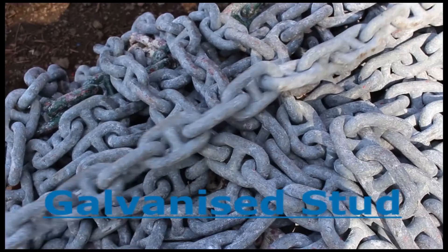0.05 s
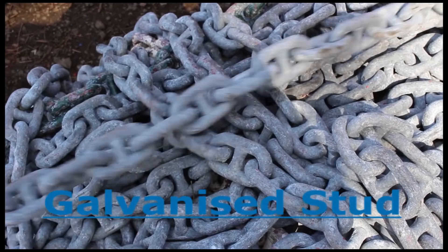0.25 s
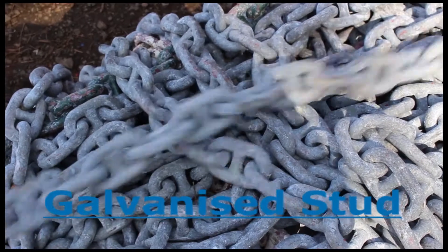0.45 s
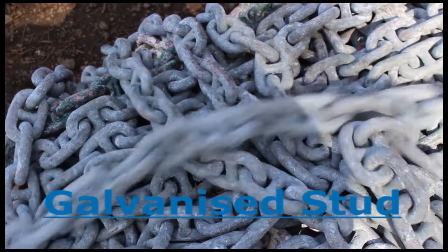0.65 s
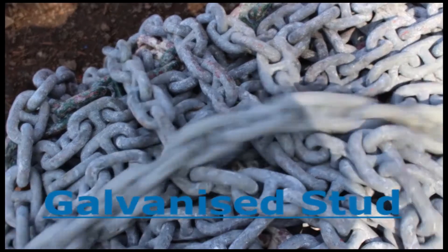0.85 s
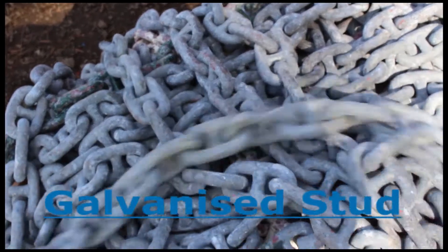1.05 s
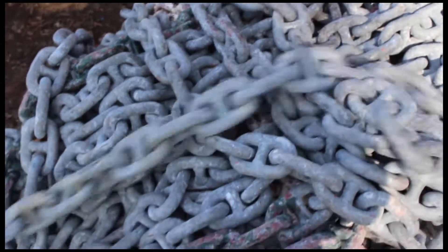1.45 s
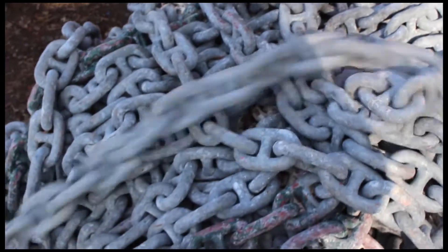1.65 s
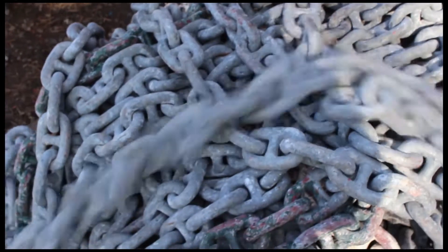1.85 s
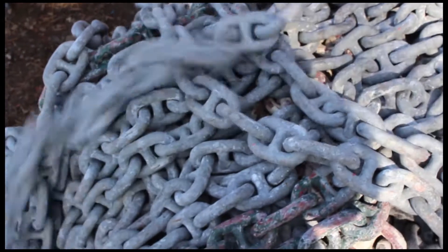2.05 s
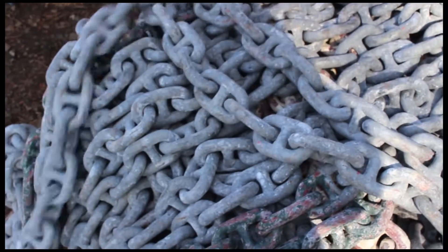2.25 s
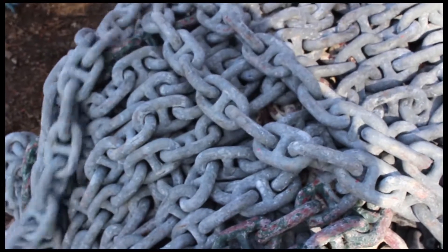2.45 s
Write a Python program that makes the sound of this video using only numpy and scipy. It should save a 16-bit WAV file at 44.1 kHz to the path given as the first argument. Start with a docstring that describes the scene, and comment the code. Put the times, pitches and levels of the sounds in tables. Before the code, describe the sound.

A heavy metal chain is hauled over a chain pile, close by outdoors. Dull knocks start at 0.2 seconds, building from 0.4 into dense rattling with short, bright clinks. It eases around 1.3 seconds, then surges at 1.4 with soft thumps of falling loops. The clinking continues until about 2.3 seconds and thins to light taps by 2.6. Faint wind rumble and a dull wash lie underneath.

```python
"""Hauling a heavy chain

A galvanised stud-link chain is hauled over a pile of chain, outdoors and close by. Each collision is a dull
knock and a short bright ring from two bending modes of a link, dying away quickly. Small contacts chatter in
between, slack loops thump onto the pile, and underneath are a dull background wash of noise and a light rumble
of wind."""
import sys
import numpy as np
from scipy import signal
from scipy.io import wavfile

SR = 44100
rng = np.random.default_rng(int(sys.argv[2]) if len(sys.argv) > 2 else 0)


def to_wav(sig):
    """Store sig (one row per channel, or 1-D mono) as 16-bit WAV at the path in sys.argv[1].

    Samples outside -1..1 are clipped; the rate is SR.
    """
    pcm = np.clip(np.atleast_2d(sig), -1, 1) * 32767
    pcm = np.round(pcm).astype(np.int16)
    wavfile.write(sys.argv[1], SR, pcm.T)  # frames by channels


N = 114660
HIT_T = np.arange(8192) / SR  # seconds since a hit


def amp(db):
    """Decibels to gain."""
    return 10 ** (np.asarray(db) / 20)


def unit(x):
    """Scales to rms 1."""
    return x / np.sqrt(np.mean(x ** 2) + 1e-20)


def fader(points):
    """Gain over the whole scene, gliding between points of time and dB."""
    return amp(np.interp(np.arange(N) / SR, *np.transpose(points)))


def add(mix, start_s, sound):
    """Mixes a sound in at its start time."""
    part = mix[max(round(start_s * SR), 0):][:len(sound)]
    part += sound[:len(part)]


def wander(rate_hz, shape):
    """Smooth random motion of rms 1."""
    return unit(signal.lfilter(*signal.butter(2, rate_hz, fs=SR), rng.standard_normal(shape)))


def colour(x, eq, tilt_db=0, corner_hz=np.inf):
    """Causal filter of unit power gain: an EQ curve, a mid-range tilt per octave, a treble roll-off."""
    hz = abs(np.fft.fftfreq(len(x), 1 / SR))
    eq_hz, eq_db = np.transpose(eq)
    db = np.interp(np.log(hz + 1), np.log(eq_hz), eq_db) + tilt_db * np.log2(np.clip(hz, 1500, 5500))
    gain = unit(amp(db) / (1 + (hz / corner_hz) ** 4))
    minimum_phase = np.exp(signal.hilbert(np.log(gain + 1e-6)).conj())
    return np.fft.ifft(np.fft.fft(x) * minimum_phase).real


# The wind's tone. Each row: frequency in Hz, relative level in dB.
WIND_EQ = [(20, -12.5), (55, -12.5), (88, 1.5), (135, -7.5), (250, -10.5), (3000, -83)]
# The wind's swells. Each row: time in seconds, level in dB.
WIND_FADER = [(0, -67), (.13, -60), (.38, -64), (.5, -68.5), (.8, -77.5), (1.15, -79), (1.42, -69),
              (1.65, -74.5), (1.9, -88), (2.6, -72)]
def wind(gust_db=2, gust_hz=15):
    """Light wind: a low rumble that wavers in quick gusts."""
    rumble = unit(colour(rng.standard_normal(N), WIND_EQ))
    gusts = unit(amp(gust_db * wander(gust_hz, N)))
    return rumble * gusts * fader(WIND_FADER)


# The wash's tone. Each row: frequency in Hz, relative level in dB.
WASH_EQ = [(40, -34), (130, -5.5), (330, 4.5), (1100, 3), (1900, -5), (7000, -30), (8600, -16),
           (13000, -51)]
# The wash's swells. Each row: time in seconds, level in dB.
WASH_FADER = [(0, -63.5), (.2, -55.5), (.39, -55), (.45, -61.5), (.55, -54), (.7, -68.5), (1.15, -62),
              (1.45, -56), (1.85, -68), (2.6, -66.5)]
def wash():
    """A dull background wash of noise that swells and fades."""
    return unit(colour(rng.standard_normal(N), WASH_EQ)) * fader(WASH_FADER)


def echo(x, level_db=-11, t60_s=0.12):
    """Brief scatter from the pile and the yard."""
    tail = rng.standard_normal(len(HIT_T)) * np.exp(-np.log(1000) * HIT_T / t60_s) * (HIT_T > .002)
    return amp(level_db) * signal.oaconvolve(x, tail / np.linalg.norm(tail))[:N]


# Loops landing and the pile shifting. Each row: start in seconds, relative level in dB,
# decay time constant in seconds, centre in Hz, width in octaves.
LOOP_FALLS = [(0.564, -38, 0.0037, 620, 1.43), (1.227, -59, 0.025, 89, .8),
              (1.421, -39.5, 0.0086, 473, 0.99), (1.45, -49, 0.012, 275, 0.68),
              (1.524, -64, 0.02, 116, 0.66), (1.594, -55, 0.015, 300, 0.42),
              (1.672, -44, 0.0025, 590, 0.86)]
def thumps(rise_s=0.0021):
    """The pile takes the weight of a falling loop: a dull resonance."""
    out = np.zeros(N)
    octaves = np.linspace(-6, 6, 25)
    for start_s, db, decay_s, hz, width in LOOP_FALLS:
        envelope = (1 - np.exp(-HIT_T / rise_s)) * np.exp(-HIT_T / decay_s)
        eq = np.column_stack([hz * 2 ** octaves, -4 * (octaves / width) ** 2])
        add(out, start_s, 2 * amp(db) * colour(rng.standard_normal(len(HIT_T)) * envelope, eq))
    return out


# The tone all knocks share. Each row: frequency in Hz, relative level in dB.
KNOCK_EQ = [(60, -31), (300, -11.5), (1100, -6), (2500, 3.5), (4800, 0.5), (6800, -5.5), (9300, 2),
            (11000, -18.5), (12800, -31), (14700, -19), (16000, -34)]
def clack_eq(centre_hz=3330, boost_db=4, width_octaves=.25):
    """The knock's tone plus a resonance that depends on how the links lie, drawn at random."""
    eq_hz, eq_db = np.transpose(KNOCK_EQ)
    hz = np.geomspace(eq_hz[0], eq_hz[-1], 200)
    octaves = np.log2(hz / centre_hz) + rng.random() - .5
    peak_db = boost_db * np.exp(-(octaves / width_octaves) ** 2)
    return np.column_stack([hz, np.interp(np.log(hz), np.log(eq_hz), eq_db) + peak_db])


def knock(hardness_db, force_db, rise_s=0.00034, crack_s=0.00058, shudder_s=0.0029):
    """A gritty crack, a quick rebound and the damped shudder of the links beneath."""
    t = HIT_T[:2048]
    since_rebound = t - .003 * rng.random()
    crack = np.exp(-t / crack_s)
    rebound = amp(-10.5) * np.exp(-abs(since_rebound) / crack_s) * (since_rebound > 0)
    shudder = amp(-7) * np.exp(-t / shudder_s)
    burst = rng.standard_normal(len(t)) * (crack + rebound + shudder) * (1 - np.exp(-t / rise_s))
    corner_hz = 9160 * amp(hardness_db + 0.099 * force_db)  # hard, strong contacts reach higher
    sound = colour(burst, clack_eq(), hardness_db, corner_hz)
    attack = sound[:round(.003 * SR)]
    return sound / np.sqrt(np.mean(attack ** 2))


MODES_HZ = np.array([[8289], [8985], [14600]])  # lower mode, upper mode, overtone
SHAPE_SPREAD, SIZE_SPREAD = np.array([[.005], [.005], [.016]]), .008  # as shares of pitch
def ring(lower_db, upper_db, t60_s, overtone_db=-31, rise_s=0.00057, flutter_hz=203):
    """One link's two beating modes and a faint overtone; size, shape and damping vary by link."""
    detune, damping = np.clip(rng.standard_normal((2, 3, 1)), -2, 2)
    size = 1 + SIZE_SPREAD * np.clip(rng.standard_normal(), -2, 2)
    hz = MODES_HZ * size * (1 + SHAPE_SPREAD * detune)
    decay = np.exp(-np.log(1000) * HIT_T / (t60_s * np.exp(0.15 * damping)))
    gains = amp([[lower_db], [upper_db], [max(lower_db, upper_db) + overtone_db]])
    flutter = 0.34 * wander(flutter_hz, (2, 3, len(HIT_T)))  # touching neighbours unsettle the ring
    phase = 2 * np.pi * (hz * HIT_T + rng.random(hz.shape))
    modes = (1 + flutter[0]) * np.cos(phase) - flutter[1] * np.sin(phase)
    return (gains * decay * modes).sum(0) * (1 - np.exp(-HIT_T / rise_s))


# The rattle of small contacts. Each row: time in seconds, relative level in dB.
CHATTER_FADER = [(0, -79.5), (.19, -66.5), (.22, -74), (.38, -57), (.44, -65), (.56, -52.5), (.65, -59),
                 (.75, -50), (.97, -52.5), (1.04, -58.5), (1.09, -49), (1.23, -59), (1.28, -63),
                 (1.335, -64.5), (1.35, -56), (1.44, -46), (1.5, -57.5), (1.58, -56), (1.66, -61),
                 (1.73, -49.5), (1.87, -58), (2.04, -52.5), (2.28, -52.5), (2.37, -60), (2.6, -66.5)]
def chatter(links=32, contacts_per_s=280, firm_db=-56, soft_hz=2670, ring_db=-5):
    """Many light contacts shared among the links; fewer and duller when the chain slows."""
    struck_link = rng.integers(0, links, N)
    motion = fader(CHATTER_FADER)
    firmness = np.minimum(motion / amp(firm_db), 1)
    strength = amp(2.5 * np.minimum(rng.exponential(1, N), 2.5))
    contacts = strength * (rng.random(N) < contacts_per_s * np.sqrt(firmness) / SR)
    knocks, rings = np.zeros((2, N))
    for link in range(links):
        hits = contacts * (struck_link == link)
        knocks += signal.oaconvolve(hits, knock(hardness_db=rng.normal(-1, 2), force_db=-6))[:N]
        # lightly touched links ring a little longer
        rings += signal.oaconvolve(hits, ring(ring_db, ring_db, t60_s=0.084))[:N]
    soft_knocks = signal.lfilter(*signal.butter(1, soft_hz, fs=SR), knocks)
    rattle = firmness * knocks + (1 - firmness) * soft_knocks + np.sqrt(firmness) * rings
    return rattle / knocks.std() * motion


# Link hitting link. Each row: start in seconds, knock level in dB, hardness as a tilt in dB per
# octave, then the lower and upper modes' levels in dB, shared between the two links.
COLLISIONS = [(0.2072, -41, -3, -49.5, -61), (0.222, -42, -1, -54, -52.5), (0.2592, -45, -5, -65, -79),
              (0.2896, -42.5, -4.5, -76, -73), (0.3437, -45, -4.5, -79, -77), (0.354, -44.5, -6, -71, -71),
              (0.389, -43, -4.5, -65, -61), (0.4042, -28.5, 2.5, -33.5, -49), (0.411, -45, -2, -54, -30.5),
              (0.4634, -43, 4, -51, -38.5), (0.491, -43, -1, -52, -46), (0.508, -35, 1, -42, -46),
              (0.5233, -37.5, -1.5, -40, -57), (0.535, -49, 0, -34.5, -56), (0.5612, -36.5, -3.5, -41, -60),
              (0.5663, -36.5, -2, -41, -52), (0.5746, -30.5, 5, -48, -50), (0.5877, -34, 4.5, -32, -39),
              (0.619, -38, 5, -42, -43), (0.6363, -42.5, -2, -41, -51), (0.672, -43.5, -0.5, -35, -54),
              (0.695, -45, 2, -35, -52), (0.7036, -42.5, 0, -41, -36.5), (0.724, -36.5, 3, -61, -36.5),
              (0.7316, -40, -2, -35, -56), (0.751, -37.5, 3, -41, -62), (0.8082, -35.5, 4, -44, -35.5),
              (0.816, -40.5, -0.5, -33, -56), (0.8242, -49, 3, -36.5, -46), (0.8449, -39.5, 5, -37, -52),
              (0.879, -52, -1.5, -32.5, -36.5), (0.9245, -37.5, 10, -30.5, -35),
              (0.9382, -77, -13, -42, -35), (0.9733, -37, 5, -44, -37), (0.991, -42.5, -1.5, -47, -62),
              (1.0025, -43, 11, -46, -36), (1.017, -46.5, 0.5, -39.5, -35.5), (1.047, -55, 3, -47, -48),
              (1.073, -37.5, 6, -58, -38), (1.0808, -39.5, -4.5, -48, -53), (1.1132, -38, 2.5, -35.5, -38),
              (1.2057, -39.5, -1, -48, -45), (1.2208, -41.5, -3, -67, -74), (1.2359, -38, -0.5, -65, -70),
              (1.3391, -44.5, -4, -63, -81), (1.389, -38, -2.5, -68, -64), (1.404, -45, 0, -48, -58),
              (1.4234, -40, -6, -48, -51), (1.4267, -33, 2, -33.5, -34), (1.4499, -36.5, 1.5, -49, -46),
              (1.4559, -37, -9.5, -38.5, -49), (1.5481, -40.5, -2, -41.5, -67),
              (1.567, -39, -3.5, -57, -57), (1.575, -36, -0.5, -64, -67), (1.583, -36.5, 3.5, -31, -47),
              (1.5983, -33.5, 5.5, -42, -36), (1.6113, -39.5, 5, -63, -53), (1.6484, -42.5, 0, -33, -42),
              (1.6942, -36.5, 1.5, -42, -45), (1.7099, -44.5, -4, -32.5, -35),
              (1.7305, -39.5, 1.5, -33.5, -50), (1.7355, -35.5, 4, -34.5, -40),
              (1.7704, -43, -2.5, -63, -52), (1.7752, -37, 5, -29.5, -32.5), (1.7948, -41.5, 4, -35, -66),
              (1.8314, -38.5, 2, -32.5, -36.5), (1.8782, -36, 15, -63, -60), (1.8938, -43, -1, -39, -56),
              (1.8995, -36.5, 4, -63, -64), (1.9321, -44, -3.5, -45, -54), (1.9397, -46, 10, -38, -42),
              (1.9828, -46.5, -4.5, -41, -34), (2.0201, -46.5, 1, -30, -48),
              (2.0268, -41.5, -3.5, -39, -43), (2.0438, -38, -1.5, -36, -34.5),
              (2.0839, -43, -4, -31.5, -37.5), (2.0886, -39.5, -0.5, -32, -61),
              (2.0985, -38.5, 4, -57, -58), (2.1053, -66, 8, -30, -32.5), (2.1494, -44.5, 25, -34, -47),
              (2.1574, -48.5, -4, -35, -37), (2.1922, -45.5, 15, -40, -51), (2.2102, -51, 7, -39, -44),
              (2.241, -44, -4.5, -46, -40), (2.2498, -39.5, 15, -31, -40), (2.34, -48, -3.5, -49, -46.5),
              (2.397, -51, -2.5, -47, -46), (2.4455, -52, 1, -43.5, -60), (2.5643, -53.5, -1, -54, -81)]
def clinks(usual_knock_db=-44, partner_db=-7.5, max_lag_s=.007):
    """The up-front hits: a knock, one link rings, and the struck link rings too as it rebounds."""
    out = np.zeros(N)
    shares = unit(amp([0, partner_db])) / np.sqrt(2)
    for start_s, knock_db, hardness_db, lower_db, upper_db in COLLISIONS:
        add(out, start_s, amp(knock_db) * knock(hardness_db, force_db=knock_db - usual_knock_db))
        for lag_s, share in zip([0, max_lag_s * rng.random()], shares):
            add(out, start_s + lag_s, share * ring(lower_db, upper_db, t60_s=0.074))
    return out


def scene():
    """The mono mix: the chain and its echo over the wind and the wash."""
    chain = clinks() + chatter() + thumps()
    return (chain + wind() + echo(chain) + wash())[None]


def record(dry):
    """A steep high cut takes off the very top."""
    high_cut = signal.firwin(301, 16200, window=("kaiser", 9), fs=SR)
    return signal.oaconvolve(dry, high_cut[None], "same")


dry = scene()
out = record(dry)
to_wav(out)
```